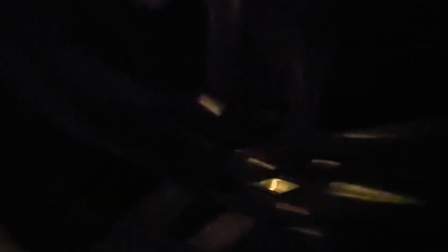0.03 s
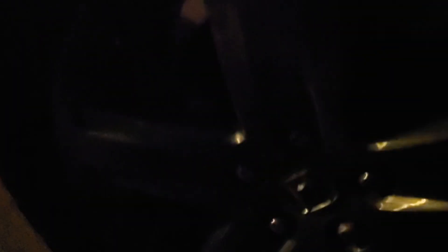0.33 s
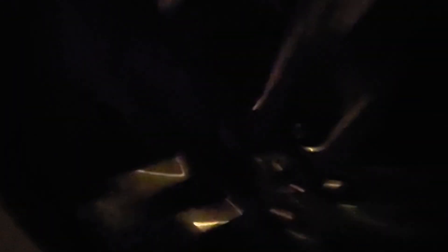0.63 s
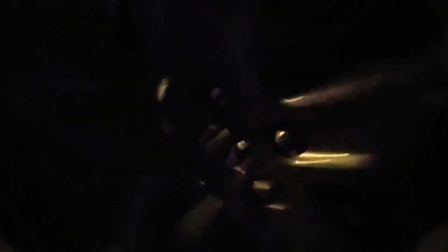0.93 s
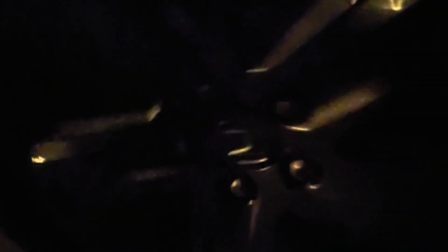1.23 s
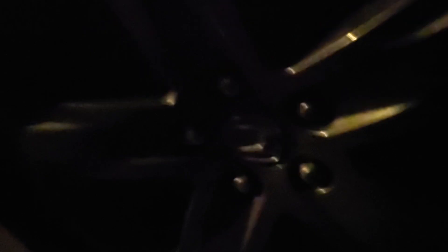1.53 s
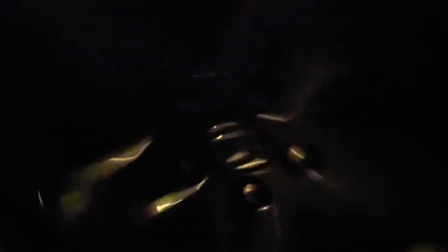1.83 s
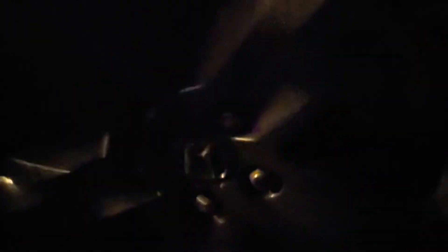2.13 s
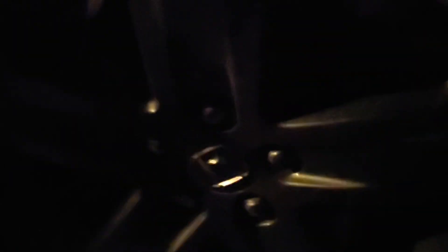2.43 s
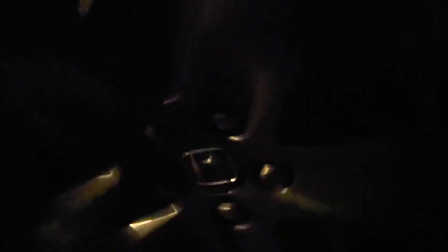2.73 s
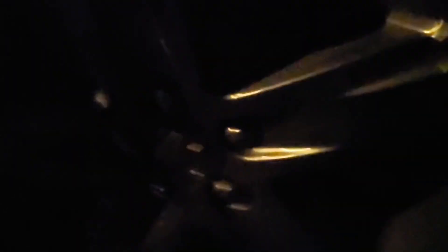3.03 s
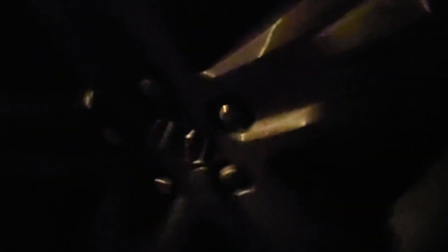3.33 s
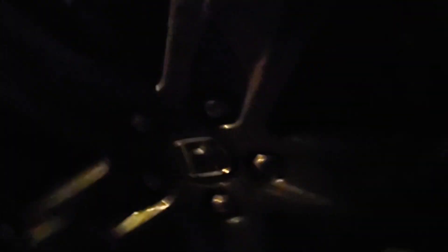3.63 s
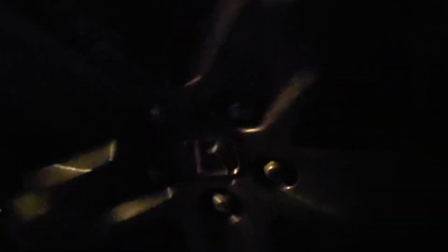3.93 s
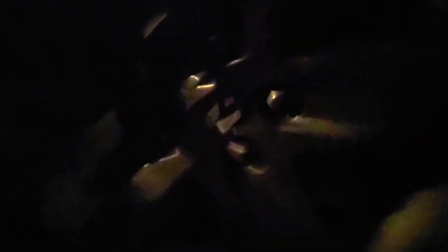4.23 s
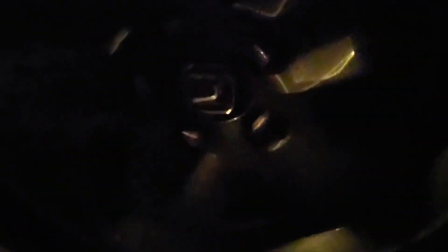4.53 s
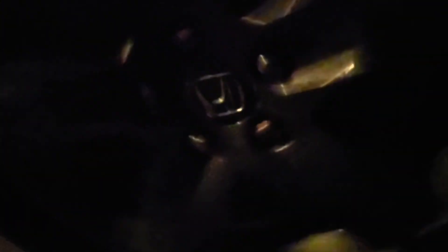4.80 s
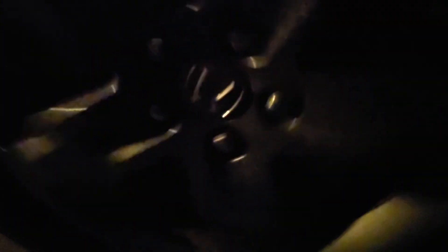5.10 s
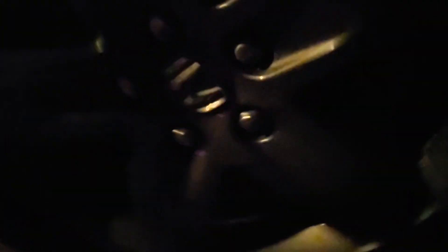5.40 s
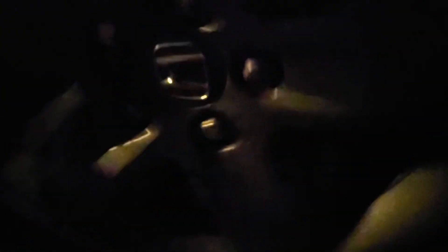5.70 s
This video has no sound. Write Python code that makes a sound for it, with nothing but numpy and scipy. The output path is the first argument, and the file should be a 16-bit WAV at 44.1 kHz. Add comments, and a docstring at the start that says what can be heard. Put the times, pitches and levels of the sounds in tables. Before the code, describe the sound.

Close to a car wheel being turned by hand, uneven metal clacks come in clusters over a soft rolling rumble and the faint hiss of brake pads. About two seconds in, the brake disc drags briefly on thin metal with a climbing whistle. Knocks and a few dull thumps continue until a louder, rough metallic grinding takes over for the last second. The garage adds a very short echo.

```python
"""Car wheel turned by hand, brake scraping

A jacked-up wheel is rocked and turned in a garage, heard up close. Loose brake parts clack, shaking
the dust shield and ringing the hub and disc. Twice the disc catches on the shield's sheet metal:
first a light drag with a rising whistle, at the end a harsh stick-slip grind.
Underneath, the pads brush the disc faintly and the turning wheel rumbles."""
import sys
import numpy as np
from scipy import signal
from scipy.fft import rfft, irfft
from scipy.io import wavfile
from scipy.ndimage import uniform_filter1d

SR = 44100
rng = np.random.default_rng(int(sys.argv[2]) if len(sys.argv) > 2 else 0)


def generate_wav(signal):
    """Clip the signal to [-1, 1] and save it as 16-bit WAV at the path in sys.argv[1]."""
    frames = np.transpose(np.atleast_2d(signal))
    scaled = np.clip(frames, -1, 1) * 32767
    pcm = np.round(scaled).astype(np.int16)
    wavfile.write(sys.argv[1], SR, pcm)


N = 254016
T = np.arange(N) / SR

# envelope of the grind's midrange (time [s], level [dB])
GRIND_LEVEL = [(4.9, -68.5), (4.906, -46.5), (4.926, -31), (4.98, -22.5), (4.988, -27), (5.292, -30),
               (5.32, -25.5), (5.446, -22.5), (5.484, -56), (5.49, -34), (5.604, -40.5), (5.76, -34)]
# tone of the grind (frequency [Hz], gain [dB])
GRIND_EQ = [(200, -16.5), (330, -12.5), (450, -4), (560, -3.5), (690, -9.5), (900, -3.5), (1400, -3),
            (1850, -5), (2200, -4.5), (3100, -14), (4300, -12.5), (8200, -15.5), (9200, -26.5),
            (16000, -22.5)]
# the contact slides along the shield (time [s], share of the late resonances [0-1])
GRIND_CROSSFADE = [(4.9, 0.1), (5.2, 0.16), (5.33, 0.55), (5.44, 0.9), (5.55, 0.48), (5.76, 0.4)]
# the grind bites hard or lets go (time [s], gain [dB])
GRIND_BITES = [(5.036, 5), (5.099, 5), (5.12, -13), (5.164, 3), (5.329, 5), (5.358, 1.5), (5.438, -4.5)]
# resonances of the dust shield and caliper for each kind of touch
# (frequency [Hz], width [Hz], knock lift [dB], drag lift [dB], early grind lift [dB], late lift [dB])
SHIELD_MODES = [(362.0, 14.0, 1.0, 17.0, 7.0, 5.0), (421.0, 10.0, 3.0, 10.0, 6.0, 5.0),
                (453.0, 21.0, 7.0, 16.0, 9.0, 3.0), (505.0, 28.0, 3.0, 18.0, 10.0, 4.0),
                (592.0, 12.0, 1.0, 15.0, 0.0, 0.0), (766.0, 10.0, 14.0, 23.0, 23.0, 19.0),
                (794.0, 10.0, 9.0, 23.0, 7.0, 13.0), (861.0, 25.0, 5.0, 0.0, 7.0, 10.0),
                (938.0, 13.0, 11.0, 17.0, 17.0, 23.0), (1011.0, 25.0, 8.0, 5.0, 13.0, 10.0),
                (1068.0, 26.0, 13.0, 0.0, 19.0, 10.0), (1143.0, 24.0, 0.0, 18.0, 0.0, 0.0),
                (1190.0, 11.0, 12.0, 21.0, 8.0, 14.0), (1309.0, 12.0, 13.0, 12.0, 10.0, 23.0),
                (1354.0, 30.0, 7.0, 7.0, 13.0, 17.0), (1423.0, 18.0, 5.0, 15.0, 10.0, 21.0),
                (1501.0, 36.0, 13.0, 21.0, 15.0, 14.0), (1601.0, 36.0, 5.0, 0.0, 13.0, 9.0),
                (1702.0, 36.0, 10.0, 3.0, 0.0, 4.0), (1815.0, 36.0, 16.0, 16.0, 0.0, 5.0),
                (1851.0, 35.0, 0.0, 9.0, 17.0, 9.0), (1940.0, 35.0, 0.0, 7.0, 16.0, 0.0),
                (2106.0, 10.0, 0.0, 0.0, 0.0, 4.0), (2246.0, 36.0, 2.0, 9.0, 0.0, 4.0),
                (2511.0, 36.0, 4.0, 3.0, 7.0, 8.0), (2823.0, 29.0, 0.0, 0.0, 9.0, 18.0),
                (2630, 70, 8, 0, 0, 0), (3776.0, 36.0, 14.0, 6.0, 7.0, 6.0), (4100, 40, 9, 0, 0, 0),
                (8100, 250, 2, 3, 3, 7)]
KNOCK, DRAG, EARLY_GRIND, LATE_GRIND = range(4)
# loose parts strike
# (time [s], length [s], clack pitch [Hz], clack level [dB], bright edge [dB], edge centre [Hz])
KNOCK_HITS = [(0.132, .012, 1190, -44, -1, 7000), (0.26, 0.055, 1146, -49, -34, 6800),
              (.689, 0.017, 1400, -37, 6.5, 4130), (0.739, 0.028, 1360, -48, 11, 5500),
              (.778, 0.016, 1280, -41.5, 4, 6500), (.827, 0.028, 1400, -44, 8.5, 4640),
              (0.847, 0.0076, 1270, -37, -16, 4500), (0.94, 0.033, 1440, -33.5, -1.5, 6960),
              (0.964, .026, 1530, -36.5, 5, 6000), (0.987, .022, 1390, -36, -7.5, 7000),
              (1.075, 0.055, 1610, -54, 9, 3500), (1.156, 0.072, 1580, -51.5, 10.5, 6900),
              (1.212, 0.063, 1315, -46, 12, 3580), (1.308, 0.094, 1540, -50.5, 4, 3460),
              (1.774, 0.0058, 1460, -61.5, 27.5, 11800), (1.94, .0063, 1330, -25, 9.5, 7500),
              (1.946, 0.0093, 1500, -24, -5, 10000), (2.551, 0.013, 1120, -51, 2, 7000),
              (2.871, 0.017, 1390, -35.5, 7, 11000), (2.895, 0.08, 1287, -40.5, 0.5, 6100),
              (2.951, 0.026, 1400, -35.5, -5.5, 4000), (3.1006, 0.0038, 1950, -36, -23, 7600),
              (3.135, .012, 1630, -43.5, 3.5, 9050), (3.196, 0.0017, 2020, -46.5, 10.5, 7400),
              (3.365, 0.012, 1340, -34, 22, 6540), (3.582, 0.0075, 1860, -52, 22, 8500),
              (3.605, 0.059, 1580, -54.5, 0, 4000), (4.134, 0.0092, 1300, -47, 13.5, 8000),
              (4.238, 0.011, 1450, -34.5, -0.5, 6200), (4.32, 0.019, 1640, -50, 10, 3500),
              (4.358, 0.013, 1530, -35.5, 3, 6000), (4.363, 0.0089, 1430, -30, 8, 13200),
              (4.427, 0.0089, 1460, -51, 39, 13000), (4.446, .016, 1400, -50, 36, 13500),
              (4.517, 0.015, 1680, -39, 26, 8100), (4.571, .016, 1670, -41, 25.5, 8600),
              (4.585, 0.011, 1410, -31, 17.5, 10200), (4.612, 0.035, 1590, -40, 9.5, 6050),
              (4.738, 0.034, 1660, -51, 14.5, 6070), (5.032, 0.0047, 1700, -35, 17.5, 6440),
              (5.491, 0.017, 1360, -28, 2.5, 5670)]
# tone of a knock (frequency [Hz], gain [dB])
KNOCK_EQ = [(200, -6.5), (450, -6), (700, -5.5), (900, -10), (1400, 4), (1850, -5.5), (2200, -4),
            (3100, -11), (4800, -17.5), (6000, -13), (8200, -16), (9200, -26), (14500, -20.5), (17000, -52)]
# free ring of the hub (frequency [Hz], gain [dB], t60 [s])
HUB_MODES = [(770, -22.5, 0.23), (1314, -24.5, 0.82), (1380, -33.5, 0.4), (1600, -18, 0.44),
             (1810, -21.5, 1)]
# free ring of the brake disc (frequency [Hz], gain [dB], t60 [s])
DISC_MODES = [(3187, -13, .15), (3783, 0, .15), (5647, -13, .25), (6250, -4, .36), (10130, -13, .11),
              (11465, -6, .09), (12735, -7, .17), (13150, -11, .1), (13810, -10, .12), (14100, -4, .11),
              (14710, -8, .11), (15480, -5, .09)]
# hard blows that reach the disc (time [s], gain [dB], pitch the striking point favours [Hz])
DISC_HITS = [(.692, -44, 3800), (1.946, -37, 3800), (3.372, -37, 3800), (3.374, -41, 13000),
             (4.241, -53, 6200), (4.364, -43, 6200), (4.43, -40, 3800), (4.432, -46, 6200),
             (4.431, -39, 14000), (4.52, -46, 12700), (4.587, -39, 12700), (4.745, -55, 14000)]
# tone of the light drag (frequency [Hz], gain [dB])
DRAG_EQ = [(180, -18), (330, -2), (450, -7.5), (690, -9.5), (900, -0.5), (1400, -7), (1850, -0.5),
           (2200, -4.5), (3100, -13), (4300, -7.5), (6300, -33), (8100, -11.5), (9200, -23), (16000, -33)]
# the hand swings the wheel (start [s], fastest [s], end [s], pad hiss [dB], pad murmur [dB])
WHEEL_SWINGS = [(-.3, 0.06, 0.35, -54, -50), (0.29, 0.68, 1.37, -58.5, -58), (.9, 1.16, 1.5, -59.5, -64),
                (1.853, 2.28, 2.55, -48.5, -53), (2.516, 2.924, 3.22, -57.5, -61.5),
                (3.205, 3.637, 3.844, -57, -70), (3.79, 4.59, 5.01, -55.5, -58), (4.848, 5.12, 5, -51, -66)]
# tone of the pads' hiss (frequency [Hz], gain [dB])
HISS_EQ = [(1180, -44.5), (2000, 3.5), (2180, 2.5), (2740, -4.5), (4230, -4.5), (6530, -2.5), (7910, -0.5),
           (9330, -6), (14900, -6), (16000, -1.5)]
# tone of the pads' murmur (frequency [Hz], gain [dB])
MURMUR_EQ = [(160, -18), (280, 9), (392, 1), (603, -1.5), (801, -9.5), (1180, -5.5), (2060, -14),
             (3670, -16.5), (4080, -16), (7000, -21.5), (9100, -68), (15400, -120)]
# envelope of the rolling wheel (time [s], relative level [dB])
RUMBLE_LEVEL = [(0.0, -57.5), (2.44, -54.5), (2.97, -60), (3.42, -54.5), (3.85, -62.5), (4.46, -54.5),
                (5.65, -55), (5.76, -51)]
# tone of the rolling wheel (frequency [Hz], gain [dB])
RUMBLE_EQ = [(12, -44), (20, -22), (40, -3), (65, -1), (87, 0.5), (124, -5), (160, -3), (206, -9.5),
             (302, -15), (420, -18), (550, -67), (920, -120)]
# low thumps: the wheel rocks on its bearing, and the last two come as the grind catches (time [s], pitch [Hz],
# envelope peak [dB], half-length [s])
LOW_THUMPS = [(2.912, 52.5, -27.5, 0.01), (3.333, 54.3, -39, 0.023), (3.404, 56, -33.5, 0.0061),
              (3.506, 74, -38, 0.0048), (3.873, 112, -47, 0.016), (3.932, 73.5, -41.5, 0.0043),
              (5.051, 118, -48, 0.026), (5.282, 146, -31.5, 0.0044)]
# likeness of left and right (frequency [Hz], correlation [0-1])
STEREO_LIKENESS = [(40, 0.82), (130, 0.86), (280, 0.89), (550, 0.88), (800, 0.51), (1200, 0.089),
                   (2000, 0.1), (16000, 0.06)]


def grind(judder_db=2.5, bite_s=0.0053, stall_at_s=5.474, stall_s=0.037):
    """The disc sticks and slips under load, shaking the shield in surges as the contact point moves."""
    mid_db = curve(GRIND_LEVEL)
    drive_db = mid_db + 30
    # the wheel all but stalls once: the groan swells and the grit drops back
    stall = np.exp(-((T - stall_at_s) / stall_s) ** 2)
    groan_db = -46 + 0.46 * drive_db + 15 * stall
    grit_db = -45.5 + 0.19 * drive_db - 7 * stall
    bite_db = sum(db * np.exp(-((T - s) / bite_s) ** 2) for s, db in GRIND_BITES)
    force = undb(bite_db + judder_db * wander(220)) * during(GRIND_LEVEL)
    fine, coarse = slips(N, spread_db=1), slips(N, spread_db=2.5)
    layers = (200, 590, groan_db, fine), (630, 3900, mid_db, fine), (2770, 15700, grit_db, coarse)
    late = np.clip(curve(GRIND_CROSSFADE), 0, 1)
    out = 0
    for touch, share in ((EARLY_GRIND, 1 - late), (LATE_GRIND, late)):
        shield = shield_body(GRIND_EQ, touch, steel_modes())
        for lo_hz, hi_hz, db, grains in layers:
            part = band(shield, lo_hz, hi_hz)
            out = out + through(grains * force * share * undb(db), part / np.linalg.norm(part))
    return out


def knocks(rise_s=0.0019, tail_db=-20, tail_s=0.0075, clack_width_hz=260, clack_lift_db=12):
    """Each knock is a short metal-on-metal chatter that shakes the shield and leaves the hub ringing."""
    out, t = np.zeros((1, N)), np.arange(12288) / SR
    for s, length, hz, db, edge_db, edge_hz in KNOCK_HITS:
        tail = undb(tail_db) * np.exp(-t / min(tail_s, 2 * length))
        force = (1 - np.exp(-t / rise_s)) * (np.exp(-(t / length) ** 2) + tail)
        modes = [(hz, clack_width_hz, clack_lift_db), *steel_modes(count=20, max_lift_db=14)]
        shield = shield_body(knock_tone(hz, edge_db, edge_hz), KNOCK, modes)
        chatter = through(slips(len(t), spread_db=-1.5) * force, shield)
        # the clack band sets the level; thud and edge ride on top
        clack_share = np.linalg.norm(band(shield, 1000, 2800, order=3)) / np.linalg.norm(shield)
        clack_rms = clack_share * np.std(chatter[:, t < length + .001])
        add(out, s, chatter * undb(db) / clack_rms)
        # harder contact rings the hub more, up to a limit, most near the clack's pitch
        hub_db = db + 0.77 * min(edge_db, -0.5)
        hub = ring(HUB_MODES, t, build_s=length, favoured_hz=hz, log_width=.1, floor=.3)
        add(out, s, np.sqrt(length / 0.0058) * undb(hub_db) * hub)
    return out


def knock_tone(clack_hz, edge_db, edge_hz, neutral_hz=1415, thud_below_hz=1020):
    """EQ of one knock: a heavier part clacks deeper with more thud; hard contact adds a bright edge."""
    hz = np.geomspace(200, 17000, 60)
    thud = 46.5 * np.log2(neutral_hz / clack_hz) / (1 + (hz / thud_below_hz) ** 8)
    width_octaves = np.where(hz < edge_hz, 1, 1.24)
    edge = edge_db * np.exp(-(np.log2(hz / edge_hz) / width_octaves) ** 2)
    return list(zip(hz, on_log_axis(KNOCK_EQ, hz) + thud + edge))


def disc_ring():
    """The disc rings on after hard blows, mostly in the modes the striking point favours."""
    out, t = np.zeros((1, N)), np.arange(16384) / SR
    for s, db, hz in DISC_HITS:
        add(out, s, undb(db) * ring(DISC_MODES, t, build_s=0.0054, favoured_hz=hz, log_width=.3, floor=.1))
    return out


def drag(start_s=1.945, fade_at_s=2.316, end_s=2.47, sag_db_per_s=4.5, fade_db_per_s=59):
    """The disc slides along the shield's edge: quick attack, sagging hold, a fade as it comes free."""
    db = -37 - sag_db_per_s * (T - start_s) - fade_db_per_s * np.maximum(T - fade_at_s, 0)
    force = undb(db + 1.2 * wander(90)) * gate(start_s, end_s, attack_s=0.0088, release_s=.03)
    shield = shield_body(DRAG_EQ, DRAG, steel_modes())
    return through(slips(N, spread_db=2.5) * force, shield / np.linalg.norm(shield))


def whistle(start_s=1.96, end_s=2.398, from_hz=3950, to_hz=5430, climb_s=0.17, swell_db_per_s=12.5):
    """A narrow, breathy friction resonance climbs and levels off during the drag."""
    hz = to_hz + (from_hz - to_hz) * np.exp(-np.maximum(T - start_s, 0) / climb_s)
    flutter = signal.sosfilt(signal.butter(2, 190, fs=SR, output="sos"), slips(N) + 1j * slips(N))
    tone = (flutter * np.exp(2j * np.pi * np.cumsum(hz) / SR)).real
    db = -52 + swell_db_per_s * (T - start_s) + 1.5 * wander(26.7)
    return unit(tone) * undb(db) * gate(start_s, end_s, attack_s=.004, release_s=0.014)


def pad_rub(hiss_trim_db=2, murmur_waver_db=2.85):
    """The pads brush the disc: a fine hiss and a grainy murmur that swell with the wheel's speed."""
    hiss_gain, murmur_gain = undb(-71), undb(-64.5)  # the bed between swings
    for start, fastest, end, hiss_db, murmur_db in WHEEL_SWINGS:
        speed = np.sin(np.pi / 2 * np.interp(T, [start, fastest, end], [0, 1, 0])) ** 0.85
        hiss_gain = np.hypot(hiss_gain, undb(hiss_db) * speed)
        murmur_gain = np.hypot(murmur_gain, undb(murmur_db) * speed)
    hiss = unit(through(slips(N, spread_db=2), body(HISS_EQ)))
    murmur_body = body(MURMUR_EQ, [(580, 95, 4.8), (875, 71, 11.3), (1150, 43, 4.3), (1685, 530, 7.7)])
    murmur = unit(through(slips(N, spread_db=2), murmur_body))
    waver = undb(murmur_waver_db * wander(45))
    return hiss * hiss_gain * undb(hiss_trim_db) + murmur * murmur_gain * waver


def wheel_rumble(trim_db=2, waver_db=1.42):
    """The wheel's low roll, partly different left and right, with soft thumps as it rocks and as the grind
    catches."""
    push = slips(N) + .8 * rng.standard_normal((2, N))
    roll = unit(through(push, body(RUMBLE_EQ)))
    roll_db = curve(RUMBLE_LEVEL) + trim_db + waver_db * wander(14)
    thumps = sum(undb(db) * np.sin(2 * np.pi * hz * (T - s)) * np.exp(-((T - s) / length) ** 2)
                 for s, hz, db, length in LOW_THUMPS)
    return roll * undb(roll_db) + thumps


def garage(x, t60_s=.2, wet_db=-11, predelay_s=.006):
    """Short, diffuse echo off the walls, different on each side."""
    t = np.arange(22050) / SR
    noise = band(rng.standard_normal((2, len(t))), 340, 13900, order=1)
    tail = noise * undb(-60 * t / t60_s) * (t > predelay_s)
    return undb(wet_db) * through(x, tail / np.linalg.norm(tail[0]))


def stereo_spread(x, smear_s=.009, step_hz=70):
    """Sound reaches left and right by different paths: centred lows, unrelated phases higher up."""
    hz = np.fft.rfftfreq(2 * N, 1 / SR)
    knots = np.arange(0, SR, step_hz)
    lag = np.interp(hz, knots, smear_s * rng.random(len(knots)))
    likeness = np.clip(on_log_axis(STEREO_LIKENESS, hz), -1, 1)
    spectrum = rfft(x, 2 * N)
    mid = spectrum * np.sqrt((1 + likeness) / 2)
    side = spectrum * np.sqrt((1 - likeness) / 2) * np.exp(-2j * np.pi * np.cumsum(lag) * hz[1])
    return irfft(np.array([mid + side, mid - side]))[:, :N]


def shield_body(eq, touch, extra_modes):
    """The shield's impulse response to one kind of touch."""
    hz, width, *lifts = np.transpose(SHIELD_MODES)
    return body(eq, [*zip(hz, width, lifts[touch]), *extra_modes])


def steel_modes(count=40, width_hz=28, max_lift_db=9):
    """Crowded upper modes of thin steel: every contact point wakes another set."""
    return [(2300 + 7000 * place, width_hz, max_lift_db * lift) for place, lift in rng.random((count, 2))]


def body(eq, modes=(), size=16384):
    """Impulse response of a broad EQ with resonant peaks (frequency [Hz], width [Hz], lift [dB])."""
    hz = np.fft.rfftfreq(size, 1 / SR)
    peaks = 1 + sum(max(undb(db) ** 2 - 1, 0) / (1 + (2 * (hz - f) / w) ** 2) for f, w, db in modes)
    low_cut = hz ** 2 / (hz ** 2 + (eq[0][0] / 2) ** 2) + 1e-4
    cepstrum = irfft(np.log(undb(on_log_axis(eq, hz)) * np.sqrt(peaks) * low_cut))
    # minimum phase: nothing rings ahead of the hit
    cepstrum[1:size // 2] *= 2
    cepstrum[size // 2 + 1:] = 0
    return irfft(np.exp(rfft(cepstrum)))[:size // 2]


def ring(modes, t, build_s, favoured_hz, log_width, floor):
    """Modes build up during a contact and then fade; those near favoured_hz are driven hardest."""
    hz, db, t60 = np.transpose(modes)[:, :, None]
    weight = floor + np.exp(-(np.log(hz.T / favoured_hz) / log_width) ** 2)
    strike = weight * np.exp(2j * np.pi * rng.random((1, len(modes))))
    partials = undb(db) * np.exp((2j * np.pi * hz - np.log(1000) / t60) * t)
    return (strike @ partials).imag * np.minimum(t / build_s, 1)


def slips(size, spread_db=0):
    """Mono friction noise: dense micro-slips whose strength varies by spread_db."""
    strength = np.repeat(undb(spread_db * rng.standard_normal(size // 32 + 1)), 32)[:size]
    return unit(rng.standard_normal((1, size)) * strength)


def wander(rate_hz):
    """Smooth random modulation at rms 1."""
    step = int(SR / rate_hz)
    return unit(uniform_filter1d(np.repeat(rng.standard_normal(N // step + 1), step), step)[:N])


def gate(start_s, end_s, attack_s, release_s):
    """Rise from start_s, hold, and die away from end_s."""
    attack = 1 - np.exp(-np.maximum(T - start_s, 0) / attack_s)
    return attack * np.exp(-np.maximum(T - end_s, 0) / release_s)


def during(rows):
    """Soft-edged gate, open over a table's time span plus 30 ms."""
    return uniform_filter1d(1. * ((T >= rows[0][0]) & (T <= rows[-1][0] + .03)), 200)


def curve(points):
    """Join (time [s], value) points into an envelope."""
    return np.interp(T, *np.transpose(points))


def on_log_axis(points, hz):
    """Join (frequency [Hz], value) points on a log-frequency axis."""
    f, value = np.transpose(points)
    return np.interp(np.log(hz + 1), np.log(f), value)


def through(x, response):
    """Play a signal through an impulse response."""
    return signal.fftconvolve(x, np.atleast_2d(response), axes=1)[:, :x.shape[1]]


def band(x, lo_hz, hi_hz, order=4):
    """Band-pass."""
    return signal.sosfilt(signal.butter(order, [lo_hz, hi_hz], "band", fs=SR, output="sos"), x + 1e-18)


def add(out, s, x):
    """Mix a sound in at time s."""
    i = max(int(s * SR), 0)
    out[:, i:i + x.shape[1]] += x[:, :N - i]


def undb(db):
    """Decibels to gain."""
    return 10 ** (np.asarray(db) / 20)


def unit(x):
    """Scale to rms 1."""
    return x / np.sqrt(np.mean(x ** 2))


def scene(left_bias_db=1.5):
    """The brake, its echo and the rumble, panned just left of centre."""
    mono = knocks() + disc_ring() + pad_rub() + drag() + whistle() + grind()
    brake = stereo_spread(mono[0])
    pan = undb([[left_bias_db / 2], [-left_bias_db / 2]])
    return (brake + garage(brake) + wheel_rumble()) * pan


def record(dry, top_hz=16000):
    """A steep low-pass trims the very top."""
    return signal.sosfilt(signal.ellip(10, .2, 70, top_hz, fs=SR, output="sos"), dry)


dry = scene()
out = record(dry)
generate_wav(out)
```